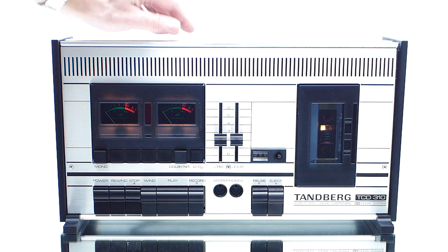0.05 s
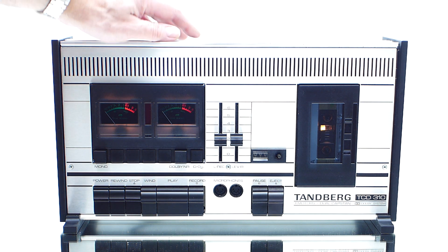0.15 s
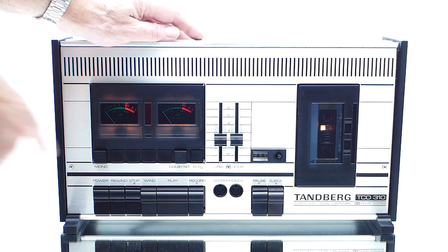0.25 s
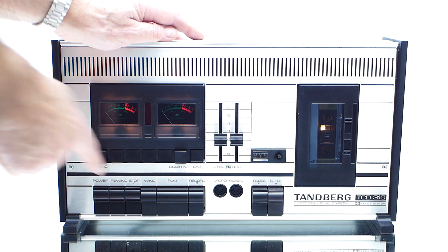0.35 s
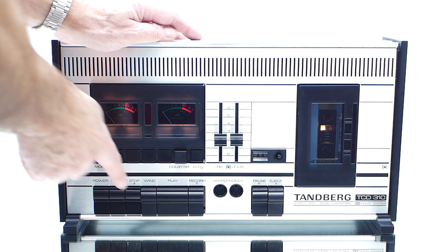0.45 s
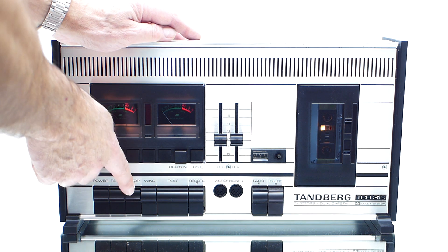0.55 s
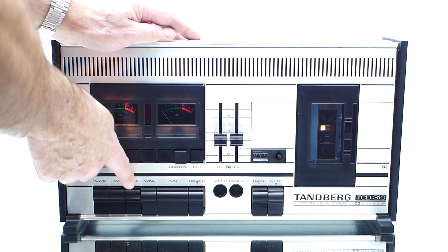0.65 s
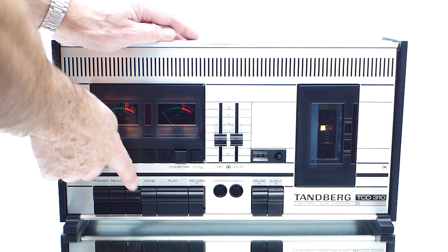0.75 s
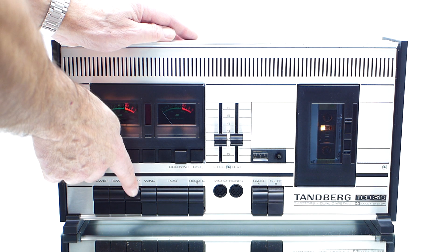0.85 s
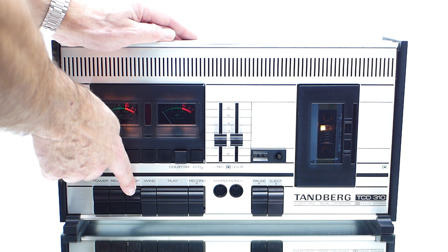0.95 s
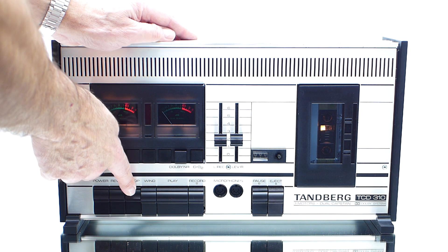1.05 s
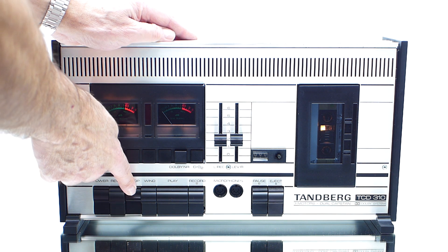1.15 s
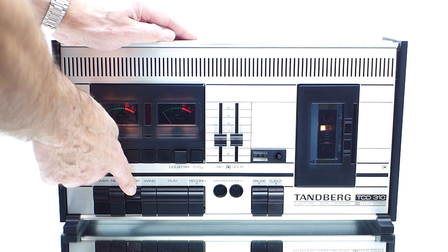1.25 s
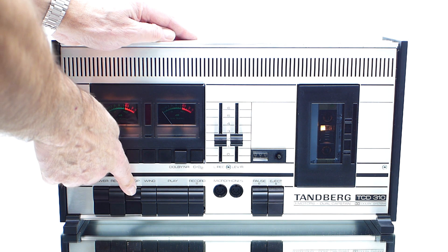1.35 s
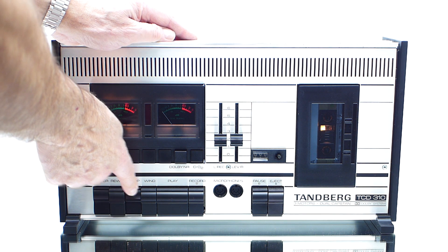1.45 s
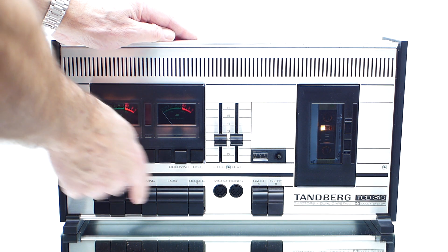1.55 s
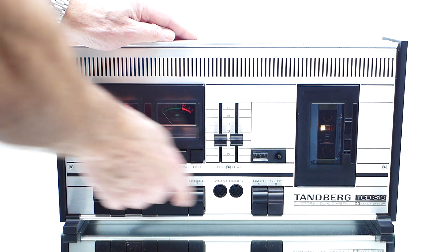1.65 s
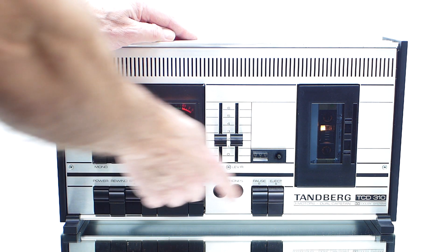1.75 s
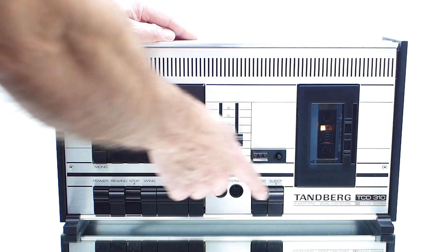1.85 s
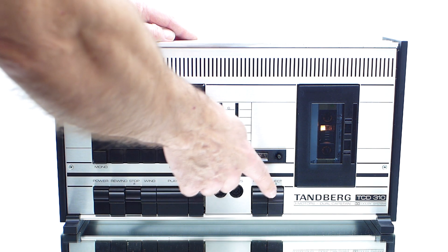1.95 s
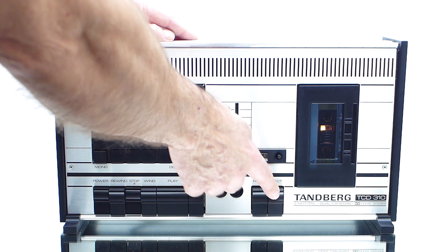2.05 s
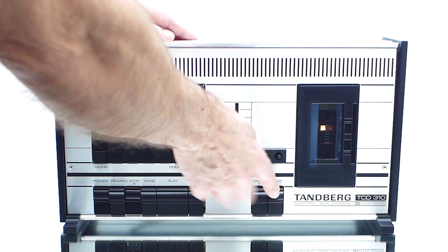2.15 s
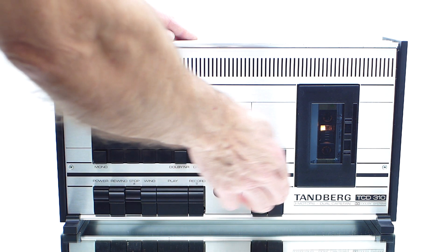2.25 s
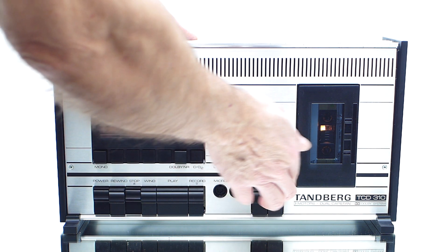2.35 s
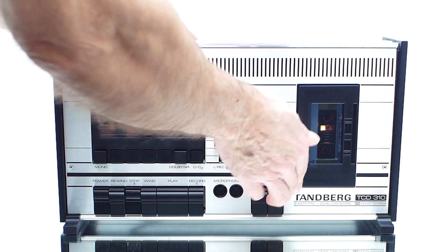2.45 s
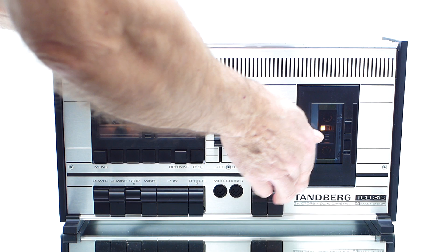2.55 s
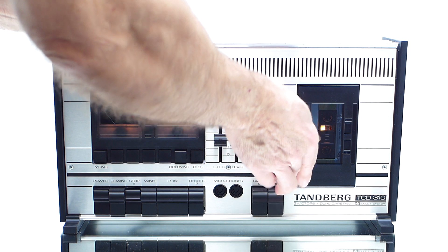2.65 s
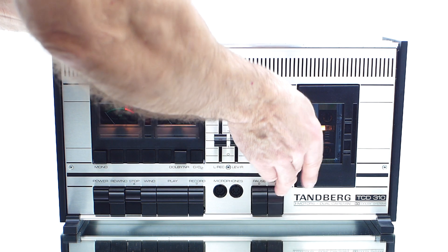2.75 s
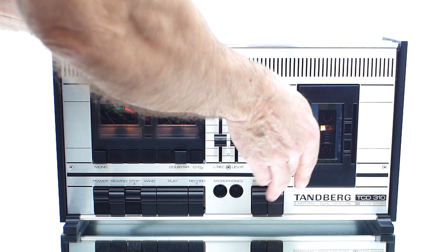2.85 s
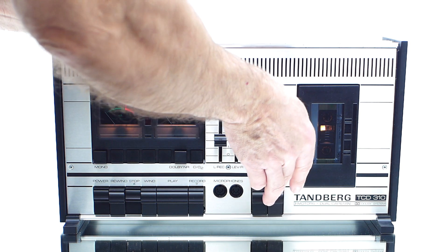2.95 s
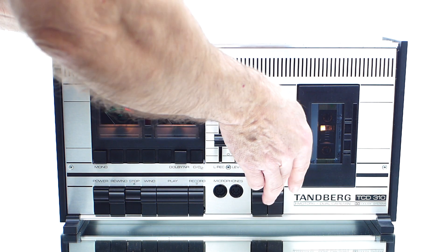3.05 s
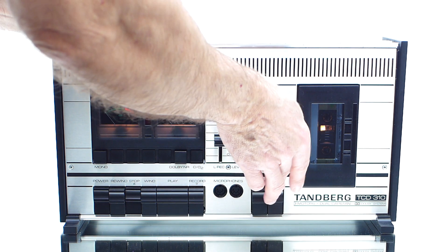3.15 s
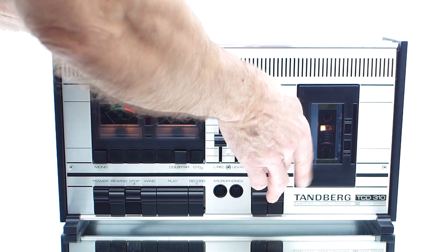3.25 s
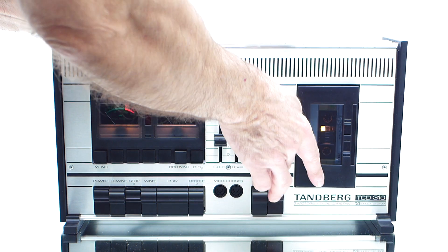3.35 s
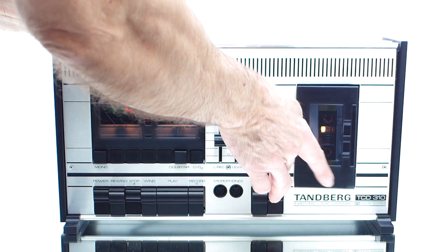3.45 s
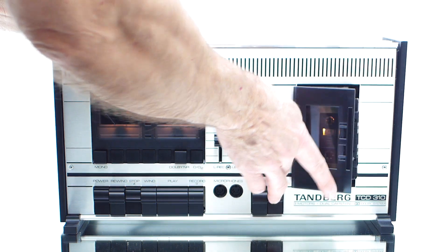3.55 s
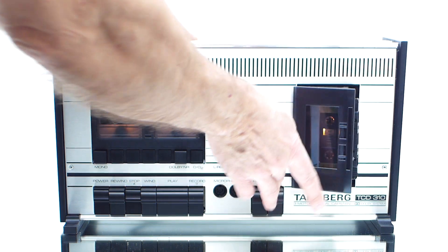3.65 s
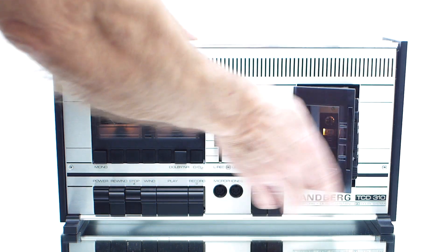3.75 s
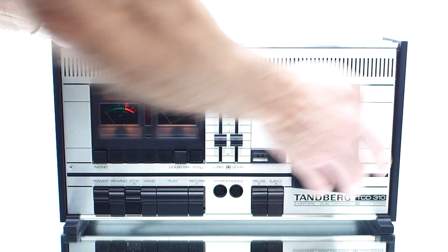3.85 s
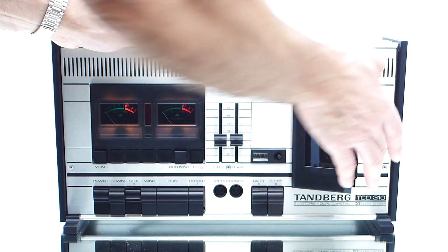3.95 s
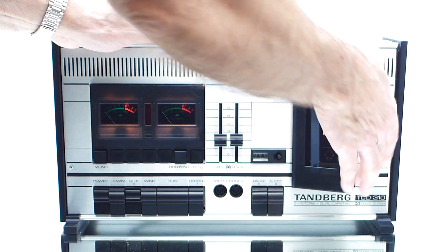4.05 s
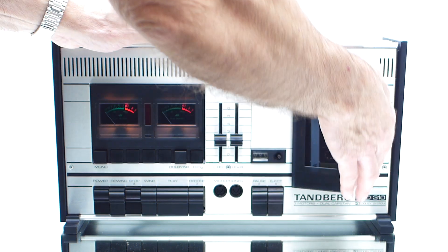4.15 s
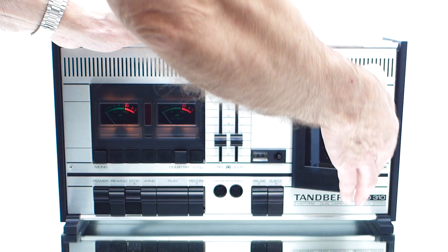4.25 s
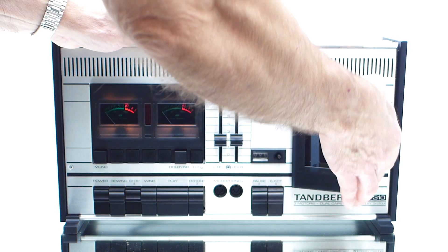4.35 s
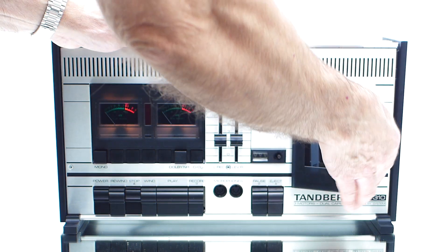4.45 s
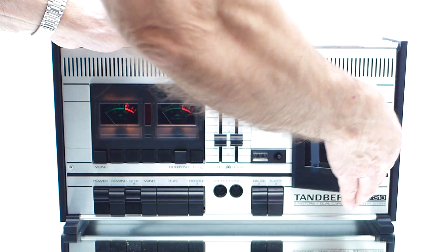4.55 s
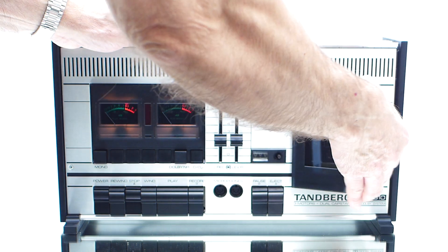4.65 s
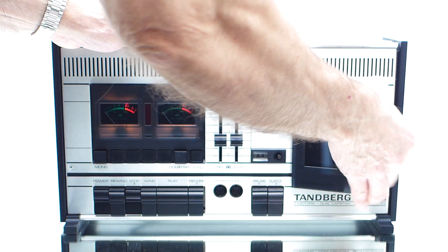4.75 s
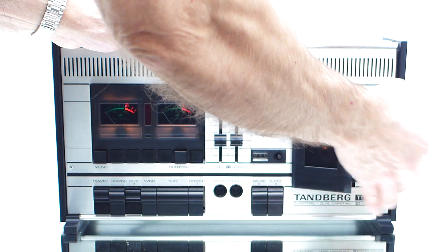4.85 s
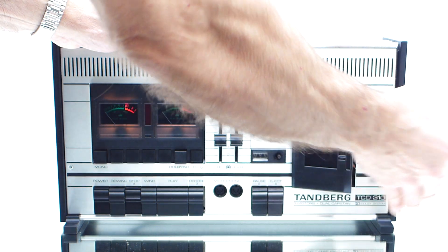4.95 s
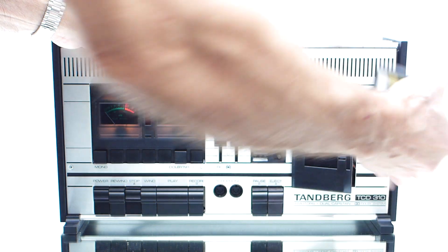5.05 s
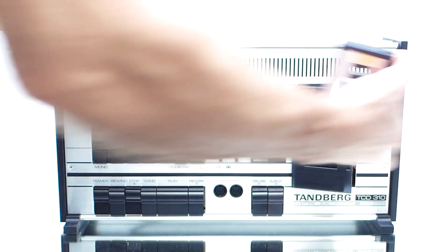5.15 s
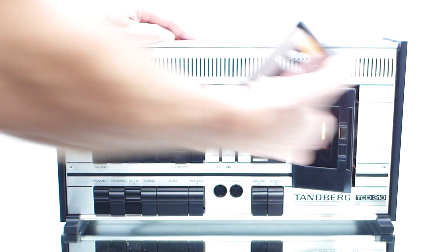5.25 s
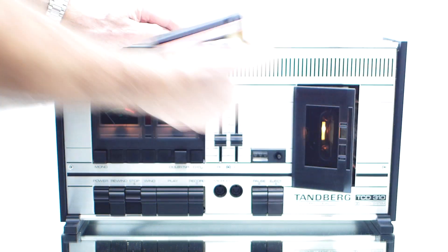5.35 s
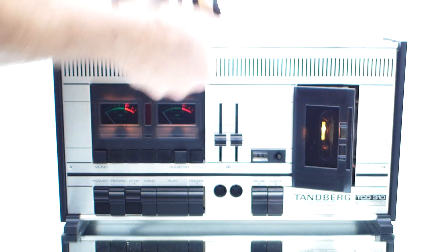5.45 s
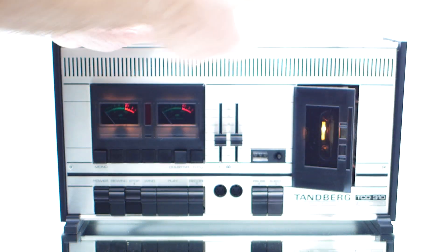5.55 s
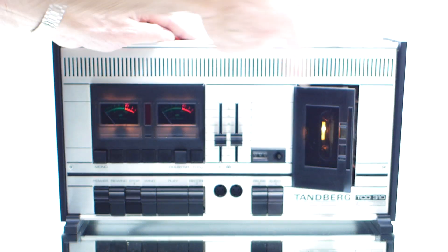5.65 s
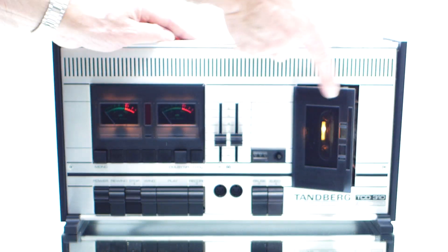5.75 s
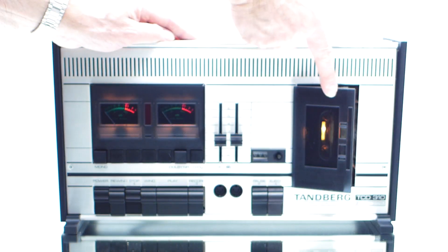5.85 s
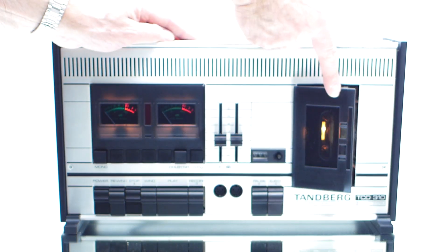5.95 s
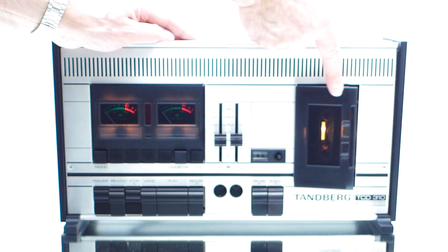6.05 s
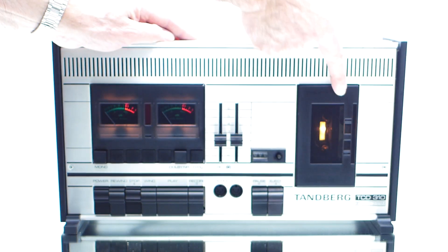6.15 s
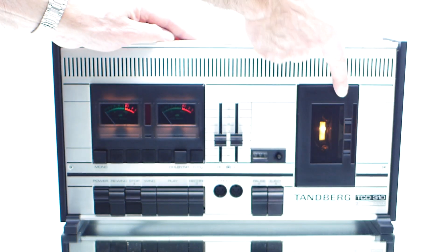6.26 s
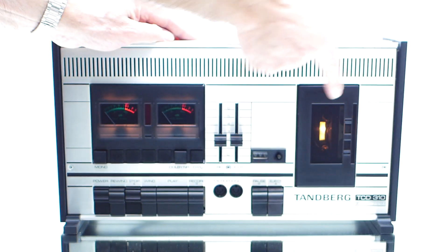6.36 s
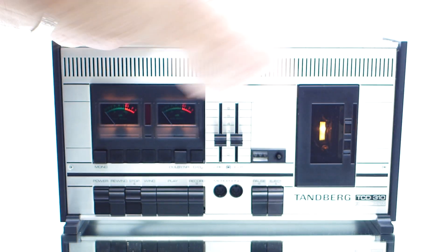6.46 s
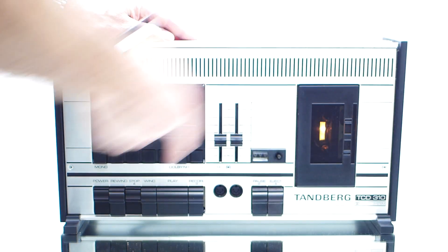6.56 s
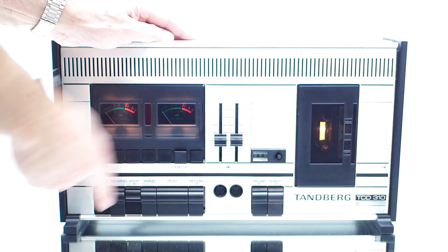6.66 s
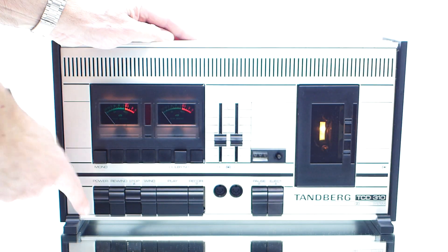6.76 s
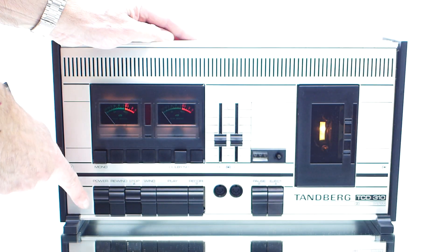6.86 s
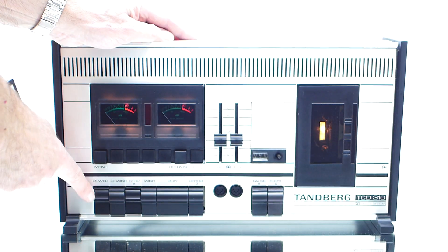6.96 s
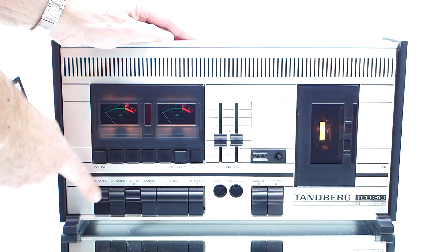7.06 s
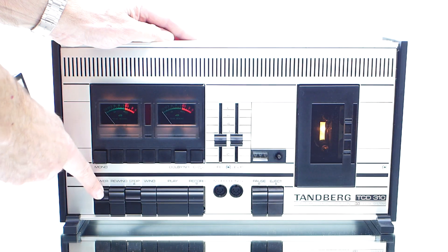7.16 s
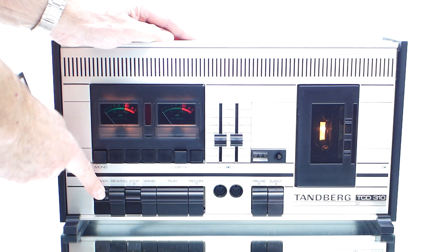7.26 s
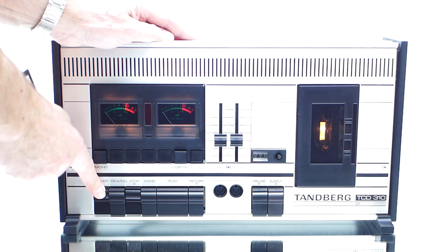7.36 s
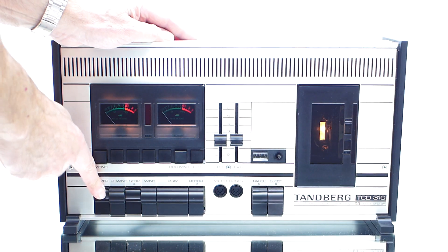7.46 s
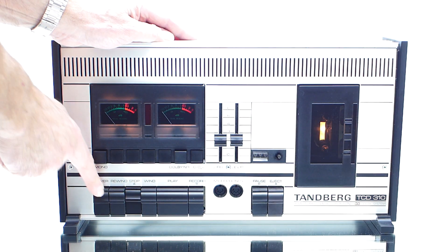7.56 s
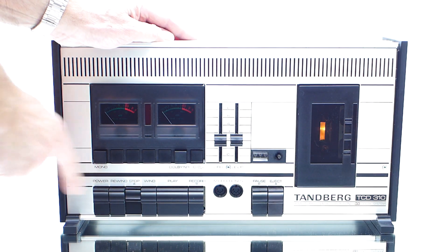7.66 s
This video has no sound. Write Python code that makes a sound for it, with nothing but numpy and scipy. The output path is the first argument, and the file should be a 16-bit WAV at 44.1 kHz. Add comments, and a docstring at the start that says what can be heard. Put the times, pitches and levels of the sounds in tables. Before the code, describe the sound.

Hard plastic and metal clicks and clunks of a cassette deck being operated by hand, each with a short bright ringing room tail over faint hiss.

```python
"""In a bare, live room, keys and the cassette door of a tape deck are worked by hand.
Each contact is a short noise crackle that rings the deck's modes; a wall echo and a diffuse tail follow.
The cassette slides out with a dry rub and hands rustle, both as grainy filtered noise.
A thin, trembling sine whistle sounds early on; banded stereo noise is the room and microphone hiss."""
import sys
import numpy as np
from scipy import signal
from scipy.io import wavfile
from scipy.ndimage import uniform_filter1d

SR = 44100
rng = np.random.default_rng(int(sys.argv[2]) if len(sys.argv) > 2 else 0)


def wav_out(sig):
    """Save sig, one row per channel (or a flat mono array), as 16-bit PCM at SR to the path in sys.argv[1]."""
    wavfile.write(sys.argv[1], SR, np.round(np.clip(np.atleast_2d(sig).T, -1, 1) * 32767).astype(np.int16))


N = 339305

# Noise spectrum of room and microphone. Each row: frequency in Hz, relative density in dB.
HISS_SPECTRUM = [(15, -30), (25, 16.5), (33, -12), (256, 3), (439, 1.5), (545, 2), (936, 0.5), (1560, -3.5),
                 (1940, -6), (3430, -13), (8360, -10), (14800, -17.5), (16000, -44)]
# Hiss over time. Each row: time in seconds, level of the 3-12 kHz part in dB.
HISS_LEVEL = [(0, -61), (.8, -62.5), (1.9, -64.5), (4.2, -65), (6, -65.5), (7.69, -63)]
# Stereo image of the hiss. Each row: frequency in Hz, left-right correlation (-1 to 1).
HISS_LIKENESS = [(60, 0.3), (180, 1), (550, -0.52), (1650, -0.56), (4970, 0.38), (15000, -0.27)]
# Faint whistle. Each row: time in seconds, pitch in Hz, peak level in dB.
SQUEAK = [(.44, 8500, -87), (.48, 8550, -62.5), (.62, 8600, -76), (.74, 8250, -70), (.78, 8200, -106.5)]
# Diffuse tail. Each row: frequency in Hz, t60 in seconds, relative level in dB, left-right correlation.
ROOM_TAIL = [(102, 0.15, -3.5, .9), (270, 0.49, 6, 0.89), (585, 0.64, 0.5, 1), (1500, 0.48, 7, 0.67),
             (3000, 0.52, 5, 0.26), (5500, 0.46, 5, 0.43), (8500, 0.45, 2.5, 0.9), (13000, 0.3, 5.5, 0.35)]
# Strokes of cassette, sleeve and fingers. Each row: start of hold in seconds, hold in seconds,
# dull level in dB, bright level in dB.
RUBS = [(0.854, 0.064, -67, -82), (4.048, 0.018, -70, -69), (4.137, .08, -69.5, -73),
        (4.33, 0.086, -73, -76.5), (4.771, .09, -61.5, -61), (4.893, 0.048, -54.5, -61.5),
        (5.093, 0.097, -74, -69.5), (5.19, 0.11, -70.5, -66.5), (5.338, 0.073, -65, -67),
        (5.43, 0.074, -57, -43.5), (5.7, .03, -71, -69), (5.813, 0.024, -67, -65.5),
        (5.937, 0.036, -74, -70.5), (6.133, .03, -61.5, -62.5), (6.214, 0.044, -57, -54.5),
        (6.9, 0.0084, -73, -75), (6.97, .03, -69, -78), (7.1, 0.14, -82, -78.5)]
# Modes of panel, door and springs. Each row: frequency in Hz, lift at the peak in dB, t60 in seconds.
DECK_MODES = [(170.7, 0.5, 0.45), (241, -5, 1.8), (265.4, 8.5, 1.2), (431, -2, 0.06), (494.5, 5.5, 0.037),
              (560, 6.5, 0.23), (620.4, 3, 0.043), (678, 1.5, 0.12), (730, 4.5, 0.78), (1045, 1.5, 0.21),
              (1370, -9, 0.0074), (1596, -7, .015), (2340, 2, 0.0047), (3380, -23.5, 0.062),
              (4910, -1, 0.0036), (5300, -5, 0.011), (8200, -6.5, 0.018), (8930, 2.5, 0.044),
              (10800, -12.5, 0.036)]
# Contacts of keys, latches and door. Each row: start in seconds, thump level in dB, knock level in dB,
# knock pitch in Hz, snap level in dB, snap pitch in Hz.
CONTACTS = [(1.1137, -63.5, -54.5, 480, -44.5, 7200), (1.2191, -39, -32.5, 940, -41, 5500),
            (1.2232, -48, -26.5, 1980, -19, 3950), (1.2279, -34, -18, 812, -11, 8500),
            (1.2344, -36, -25, 1180, -26.5, 8900), (1.4928, -66, -41.5, 560, -47.5, 7250),
            (1.5114, -62.5, -45.5, 761, -57, 5370), (2.2013, -69, -59, 708, -58, 8510),
            (2.2928, -59, -39, 700, -62.5, 7040), (2.3482, -60, -48.5, 727, -67, 4620),
            (2.371, -57.5, -42, 1066, -52.5, 3600), (2.4381, -53, -39.5, 676, -68, 4620),
            (2.508, -64, -42.5, 1200, -58, 2850), (2.5444, -49, -47, 570, -47.5, 8760),
            (2.6838, -49, -38.5, 1200, -65.5, 3300), (2.702, -31, -11, 1068, -21, 5290),
            (3.1045, -58, -44, 1480, -73, 4530), (3.1316, -54, -43.5, 833, -37, 9150),
            (3.3571, -47, -32, 1660, -35, 5570), (3.3743, -40, -28.5, 694, -28.5, 4810),
            (3.378, -47.5, -29.5, 1880, -34, 8000), (3.5441, -47, -34, 1960, -43, 8870),
            (3.5648, -37, -21, 1280, -33, 7000), (3.5795, -29, -24.5, 2050, -31, 8000),
            (3.593, -37, -16, 2540, -12, 6180), (3.6, -43, -19, 431, -17.5, 8500),
            (3.6075, -30.5, -16, 1500, -11.5, 8500), (3.737, -40.5, -28, 1500, -32.5, 5260),
            (4.7244, -59, -59.5, 1300, -61, 5770), (4.7714, -54, -47, 1500, -50, 7170),
            (5.1801, -66, -59, 1100, -56.5, 7060), (5.242, -72, -56.5, 1620, -60, 8100),
            (5.41, -61, -44, 2340, -41.5, 6500), (5.419, -67, -30.5, 2220, -54, 4370),
            (5.455, -48, -27, 1830, -21.5, 5730), (5.4717, -57, -35, 1700, -35, 3370),
            (6.143, -51.5, -50, 1390, -58, 3500), (6.243, -29, -26, 1500, -21.5, 6730),
            (6.2485, -22.5, -21, 1810, -22.5, 5680), (6.2556, -23, -21.5, 560, -25, 7200),
            (6.7013, -66, -58.5, 1590, -69, 5130), (6.7458, -59.5, -58.5, 2080, -61, 4160),
            (7.04, -64, -59, 586, -61, 4190), (7.3889, -52, -46, 1610, -29, 7440),
            (7.5346, -47.5, -50, 1000, -68, 8150), (7.585, -45, -30.5, 970, -27.5, 6960),
            (7.5915, -40, -33, 720, -34.5, 3440)]
# Crackle bands. Each row: lower edge in Hz, upper edge in Hz.
BANDS_HZ = [(170, 400), (400, 820), (900, 1900), (1900, 3600), (3800, 6400), (6700, 10300), (10300, 13000)]

# Thump, knock, snap: fall below and above the pitch in dB per octave squared (before the spring factor).
FALL_BELOW_DB, FALL_ABOVE_DB = [9, 11.5, 10.5], [32.5, 6, 6.5]
CRACKLE_T60_S = [0.013, 0.046, 0.033]
THUMP_HZ = 260
SPRING_HZ, SPRING_STEEP = 7650, 10   # snaps above this pitch come from small springs: a narrower hump
RISE_S, RISE_CYCLES = 0.00038, 0.69   # rise time plus cycles of the band's lower edge: lows swell slower
PART_LIFT_DB, PART_WIDTH = 1.5, 0.046   # struck part's two resonances: lift, width as a share of pitch
# Share sent to room and panel; the hardest snaps send less, in dB per dB.
SENT_DB, SENT_LOSS_FROM_DB, SENT_LOSS = 0, -24.5, 0.42
RUB_RISE_DB_PER_S, RUB_FALL_DB_PER_S = 707, 265.5
WALL_S, WALL_DB = 0.0135, -8
ROOM_DB, EARLY_DB = -2, -6.5   # whole tail; scatter ahead of the wall's answer
SPREAD_DB, SIDE_LAG_SAMPLES = -12.5, 3
MIC_LOW_HZ, CUTOFF_HZ = 109, 16600
GAIN_KNEE_DB, GAIN_SHARE, GAIN_RELEASE_DB_PER_S = -49, 0.13, 74
OFFSET = -0.003


def from_db(db):
    """Decibels to gain."""
    return 10 ** (np.asarray(db) / 20)


def rms_one(x):
    """Scale to rms 1."""
    return x / np.sqrt(np.mean(x ** 2) + 1e-20)


def band(x, low_hz, high_hz, order=2):
    """Butterworth band-pass."""
    sos = signal.butter(order, [low_hz, high_hz], "band", fs=SR, output="sos")
    return signal.sosfilt(sos, x)


def resonance(x, hz, width_hz):
    """Two-pole resonance with gain 1 at its peak."""
    r = np.exp(-np.pi * width_hz / SR)
    w = 2 * np.pi * hz / SR
    zeros = [(1 - r * r) / 2, 0, (r * r - 1) / 2]
    poles = [1, -2 * r * np.cos(w), r * r]
    return signal.lfilter(zeros, poles, x + 1e-18)


def at_hz(points, hz, column=1):
    """Read a table on a log-frequency axis."""
    points = np.array(points)
    return np.interp(np.log(hz), np.log(points[:, 0]), points[:, column])


def curve(rows, column, outside=-120):
    """One column of a time table, with a fixed value outside it."""
    rows = np.array(rows)
    return np.interp(np.arange(N) / SR, rows[:, 0], rows[:, column], outside, outside)


def stereo_bands(size, gain, likeness):
    """Half-octave bands of stereo noise, each with its own gain(hz) and left-right correlation."""
    edges_hz = 25 * 2 ** np.arange(0, 9.6, 0.5)
    white = rng.standard_normal((2, 2, size))   # neighbouring bands take different noise
    out = 0
    for k, (low_hz, high_hz) in enumerate(zip(edges_hz, edges_hz[1:])):
        mid, side = band(white[k % 2], low_hz, high_hz)
        hz = np.sqrt(low_hz * high_hz)
        alike = np.clip(likeness(hz), -1, 1)
        pair = np.sqrt(1 + alike) * mid + np.sqrt(1 - alike) * side * [[1], [-1]]
        out = out + gain(hz) * pair
    return out


def hiss():
    """Room air and microphone noise: shaped random noise, levelled by its 3-12 kHz part."""
    noise = stereo_bands(N, lambda hz: from_db(at_hz(HISS_SPECTRUM, hz)),
                         lambda hz: at_hz(HISS_LIKENESS, hz))
    level = from_db(curve(HISS_LEVEL, 1, outside=-66))
    return level * noise / np.std(band(noise[0], 3000, 12000))


def squeak():
    """A thin sine whistle whose pitch trembles at random."""
    tremble_hz = 60 * rms_one(band(rng.standard_normal(N), 15, 150))
    pitch_hz = curve(SQUEAK, 1, outside=8900) + tremble_hz
    return from_db(curve(SQUEAK, 2)) * np.sin(2 * np.pi * np.cumsum(pitch_hz) / SR)


def room(x):
    """Weak early scatter until the walls answer, then a diffuse tail that dies band by band."""
    t = np.arange(SR) / SR

    def decay(hz):
        return from_db(at_hz(ROOM_TAIL, hz, column=2) - 60 * t / at_hz(ROOM_TAIL, hz))

    tail = stereo_bands(SR, decay, lambda hz: at_hz(ROOM_TAIL, hz, column=3))
    tail = tail * np.where(t < WALL_S, from_db(EARLY_DB), 1)
    tail = from_db(ROOM_DB) * tail / np.sqrt(np.sum(tail ** 2) / 2)
    return signal.fftconvolve(x[None], tail, axes=1)[:, :N]


def stroke_db(start_s, hold_s):
    """A stroke swells, holds and fades, linearly in dB."""
    t = np.arange(N) / SR - start_s
    return RUB_RISE_DB_PER_S * np.minimum(t, 0) - RUB_FALL_DB_PER_S * np.maximum(t - hold_s, 0)


def rubbing():
    """Dense small grains of friction, a dull part through the plastic and a bright part in air."""
    grain_db = 2.5 * rng.exponential(1, (2, N))
    grains = rng.standard_normal((2, N)) * from_db(grain_db)
    dull = rms_one(band(grains[0], 350, 2100))
    bright = rms_one(band(grains[1], 4000, 12000))
    out = np.zeros(N)
    for start_s, hold_s, dull_db, bright_db in RUBS:
        friction = from_db(dull_db) * dull + from_db(bright_db) * bright
        out += from_db(stroke_db(start_s, hold_s)) * friction
    return out


def deck(force):
    """The modes ring in parallel; a t60 gives a width of ln(1000) / (pi t60)."""
    out = np.zeros(N)
    for hz, lift_db, t60_s in DECK_MODES:
        width_hz = np.log(1000) / (np.pi * t60_s)
        out += from_db(lift_db) * resonance(force, hz, width_hz)
    return out


def colour(levels_db, pitches_hz):
    """Thump, knock and snap are three spectral humps; per band, summed gain and mean crackle t60."""
    centres_hz = np.sqrt(np.prod(BANDS_HZ, axis=1))
    octaves = np.log2(centres_hz[:, None] / pitches_hz)
    fall_db = np.where(octaves < 0, FALL_BELOW_DB, FALL_ABOVE_DB) * octaves ** 2
    spring_factor = 1 + (pitches_hz / SPRING_HZ) ** SPRING_STEEP
    power = from_db(levels_db - fall_db * spring_factor) ** 2
    total = power.sum(axis=1)
    return np.sqrt(total), power @ CRACKLE_T60_S / total


def contacts():
    """Each contact is a dying burst of micro-slips, coloured by three humps and the struck part's ring.
    The room gathers it from all directions, so it gets the same energy with a smooth spectrum."""
    out = np.zeros((2, N + SR))   # direct, radiated
    t = np.arange(SR // 8) / SR
    slips = rng.standard_normal((len(CONTACTS), len(BANDS_HZ), len(t)))
    smooth = [rms_one(band(t == 0, low_hz, high_hz, order=3)) for low_hz, high_hz in BANDS_HZ]
    rise_s = RISE_S + RISE_CYCLES / np.min(BANDS_HZ, axis=1)[:, None]
    rise = np.minimum(t / rise_s, 1)
    for (start_s, thump_db, knock_db, knock_hz, snap_db, snap_hz), slip in zip(CONTACTS, slips):
        levels_db = np.array([thump_db, knock_db, snap_db])
        gains, t60_s = colour(levels_db, np.array([THUMP_HZ, knock_hz, snap_hz]))
        sent_db = SENT_DB - SENT_LOSS * max(snap_db - SENT_LOSS_FROM_DB, 0)
        burst = slip * from_db(-60 * t / t60_s[:, None]) * rise
        both = np.zeros((2, len(t)))
        for (low_hz, high_hz), gain, force, blow in zip(BANDS_HZ, gains, burst, smooth):
            part = band(force, low_hz, high_hz, order=3)
            loudest_power = uniform_filter1d(part ** 2, size=SR // 200).max()   # 5 ms mean
            part = gain * part / np.sqrt(loudest_power)
            both += np.array([part, from_db(sent_db) * np.std(part) * blow])
        rings = sum(resonance(both, hz, PART_WIDTH * hz) for hz in (knock_hz, snap_hz))
        at = round(start_s * SR)
        out[:, at:at + len(t)] += both + from_db(PART_LIFT_DB) * rings
    return out[:, :N]


def scene():
    """The deck stands a little to the right; its treble reaches two ports by slightly different paths.
    The wall behind returns one clear echo."""
    direct, radiated = contacts()
    rub = rubbing()
    lasting = deck(radiated + rub) + rub + squeak()
    near = direct + lasting
    late_treble = np.roll(band(near, 3000, 18000, order=1), shift=SIDE_LAG_SAMPLES)
    spread = from_db(SPREAD_DB) * late_treble * [[1], [-1]]
    echo = from_db(WALL_DB) * np.pad(near, (round(WALL_S * SR), 0))[:N]
    wet = near + spread + room(radiated + lasting) + echo
    high_pass = signal.butter(3, MIC_LOW_HZ, "high", fs=SR, output="sos")
    thin = signal.sosfilt(high_pass, wet)   # small parts radiate little bass
    push = from_db(-24.5) * band(np.abs(direct), 40, 150, order=1)   # soft low push with each blow
    return thin * from_db([[-0.6], [0.6]]) + push + hiss()


def record(dry):
    """Gain control ducks on loud blows and recovers; a small steady offset; the top is cut."""
    power = uniform_filter1d(np.mean(dry ** 2, axis=0), size=SR // 200)
    level_db = 10 * np.log10(power + 1e-12)
    wanted_db = GAIN_SHARE * np.maximum(level_db - GAIN_KNEE_DB, 0)
    ramp_db = GAIN_RELEASE_DB_PER_S * np.arange(N) / SR
    duck_db = np.maximum.accumulate(wanted_db + ramp_db) - ramp_db   # instant attack, linear release
    ducked = dry * from_db(-uniform_filter1d(duck_db, size=SR // 400))
    low_pass = signal.cheby2(14, 70, CUTOFF_HZ, fs=SR, output="sos")
    return signal.sosfilt(low_pass, ducked + OFFSET)


dry = scene()
out = record(dry)
wav_out(out)
```